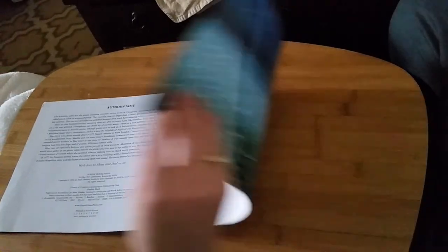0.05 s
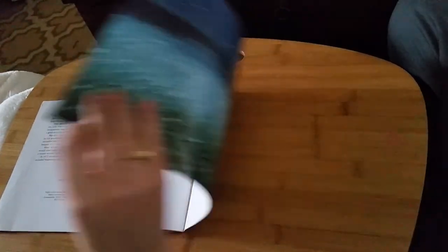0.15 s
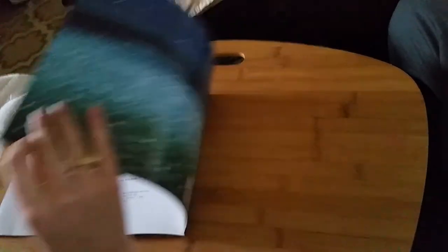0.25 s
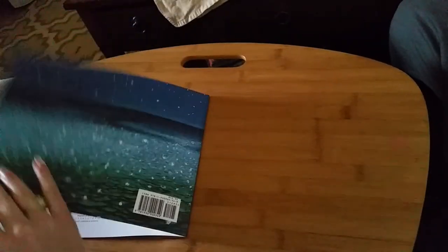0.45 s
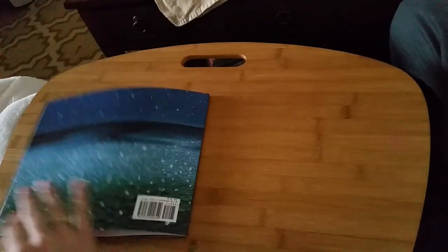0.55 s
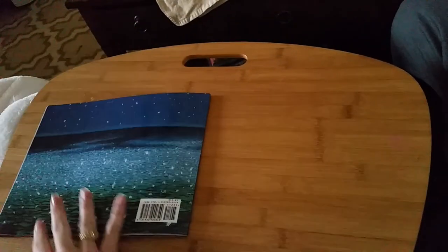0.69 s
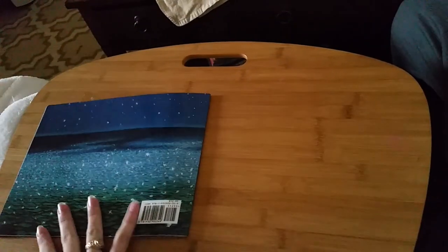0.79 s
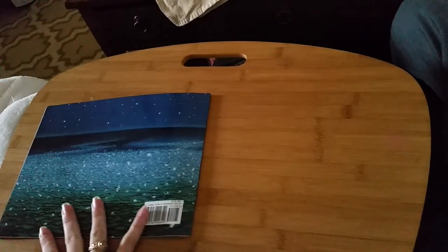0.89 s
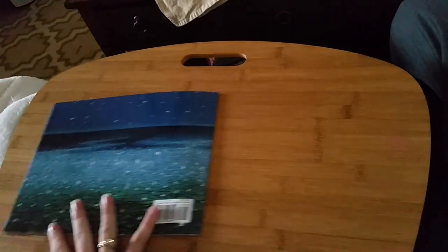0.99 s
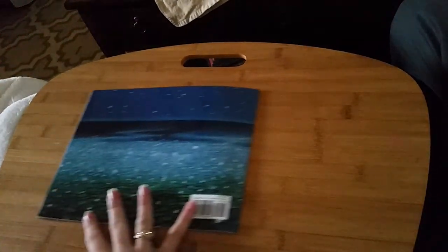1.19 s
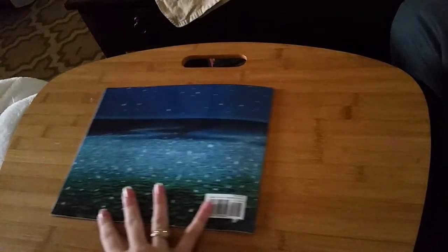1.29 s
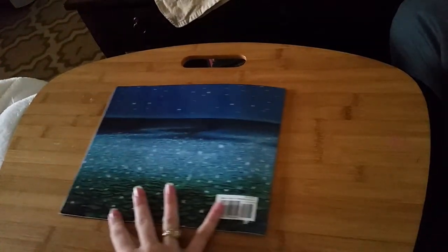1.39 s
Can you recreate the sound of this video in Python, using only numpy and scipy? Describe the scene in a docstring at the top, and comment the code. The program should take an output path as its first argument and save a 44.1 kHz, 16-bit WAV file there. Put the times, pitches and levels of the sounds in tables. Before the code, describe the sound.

Dull thumps and soft rustling as a book is closed and nudged across a lap board.

```python
"""A quiet room, the microphone close to a thin book on a wooden lap board, steady hiss underneath.
The cover swings over and stirs a low rumble, then lands with a dull thump, left of the microphone.
It settles with small knocks and a rustle of pages. Last, the hand slides the book across the board:
a fine friction hiss with a faint whistle that glides up and back down with the book's speed."""
import sys
import numpy as np
from scipy import signal
from scipy.fft import rfft, irfft
from scipy.io import wavfile
from scipy.ndimage import uniform_filter1d

SR = 44100
rng = np.random.default_rng(int(sys.argv[2]) if len(sys.argv) > 2 else 0)


def unload_audio(sound):
    """Save the sound as a 16-bit wav file, at the path given as the first command line argument."""
    columns = np.transpose(np.atleast_2d(sound))
    # keep every value between -1 and 1, then stretch to whole-number steps
    steps = np.round(np.clip(columns, -1, 1) * 32767)
    wavfile.write(sys.argv[1], SR, steps.astype(np.int16))


N = 63945
T = np.arange(N) / SR


def amp(db):
    """Decibels to gain."""
    return 10 ** (np.asarray(db) / 20)


def unit_rms(x):
    """Scales a signal to rms 1."""
    return x / np.sqrt(np.mean(x ** 2) + 1e-20)


def curves(table, at):
    """Every value column of a table, interpolated along its first column."""
    key, *columns = np.transpose(table)
    return np.array([np.interp(at, key, column) for column in columns])


def add(mix, start_s, sound):
    """Mixes a stereo sound in at a given time."""
    part = mix[:, max(round(start_s * SR), 0):][:, :sound.shape[1]]
    part += sound[:, :part.shape[1]]


def lowpass(x, hz, order):
    """Causal Butterworth low-pass."""
    return signal.sosfilt(signal.butter(order, hz, fs=SR, output="sos"), x)


def noise(spectrum):
    """Unrelated left and right noise with a spectrum in dB per Hz."""
    log_hz = np.log(np.fft.rfftfreq(N, 1 / SR) + 1)
    density_db = curves([(np.log(hz), *levels) for hz, *levels in spectrum], log_hz)
    white = rng.standard_normal((2, N))
    return irfft(rfft(white) * amp(density_db), N) * np.sqrt(SR / 2)


def wander(samples):
    """A smooth random curve of rms 1 that changes over the given number of samples."""
    smoothed = uniform_filter1d(rng.standard_normal(N), samples)
    return unit_rms(uniform_filter1d(smoothed, samples))


def room_tone():
    """The quiet room's low rumble and a narrow hiss, flickering slightly in level."""
    # Noise floor: freq_hz, left_db_per_hz, right_db_per_hz
    spectrum = [(29.3, -66.5, -95), (114, -68.5, -80), (216, -81.5, -86.5), (388, -88.5, -92.5),
                (870, -92, -99), (1460, -98, -102), (1795, -109, -107), (2490, -104, -109),
                (2810, -112, -115), (3240, -104, -114), (3652, -88.5, -111), (4100, -82, -109),
                (4770, -86.5, -112), (5833, -95.5, -117), (6480, -122, -125), (9000, -137, -137),
                (12000, -121, -119), (15500, -119, -117)]
    flicker_db = 0.76 * wander(samples=250)
    return noise(spectrum) * amp(flicker_db)


def room_tail(sound):
    """The furnished room's short reverberation, weak this close to the book."""
    level_db, t60_s, onset_s = -27, 0.11, 0.02
    t = np.arange(SR // 2) / SR
    envelope = np.exp(-np.log(1000) * t / t60_s) * np.minimum(t / onset_s, 1)
    tail = rng.standard_normal((2, len(t))) * envelope
    tail /= np.linalg.norm(tail[0])
    return amp(level_db) * signal.fftconvolve(sound, tail, axes=1)[:, :N]


def handling_rumble():
    """Low rumble that swells as cover and hand move near the microphone."""
    # Rumble before swell and balance: freq_hz, level_db_per_hz
    spectrum = [(15, -67), (33, -57.5), (60, -68.5), (120, -73.5), (180, -88.5), (300, -102), (600, -125),
                (2000, -160)]
    # Swell with the movement, before balance: time_s, left_db, right_db
    swell = [(0, 14.5, 24.5), (.09, 4.5, 4.5), (.18, 20, -10), (.27, 7.5, 9), (.35, 22.5, 21.5),
             (.47, 7, 4), (.56, 6, 13), (.76, -2.5, 9), (1.0, 0, -11), (1.15, -3, 10), (1.31, 2.5, 29),
             (1.4, -2.5, 24)]
    balance_db = [[0], [-26.5]]
    return noise(spectrum) * amp(curves(swell, T)) * amp(balance_db)


def brushes():
    """Paper and fingers brush lightly: faint swishes that swell and fade."""
    # Swish before each stroke's gain: freq_hz, left_db_per_hz, right_db_per_hz
    spectrum = [(101.4, -100, -100), (500, -81.5, -94.5), (1280, -98.5, -100.5), (1940, -106, -101),
                (2350, -103, -94), (3000, -118, -113), (7000, -135, -130), (15000, -130, -125)]
    # Light strokes: middle_s, half_length_s, gain_db
    strokes = [(0.31, 0.17, -2), (0.713, 0.017, -5), (1.065, 0.017, -4.5)]
    swell = sum(amp(db) * np.exp(-((T - middle_s) / half_s) ** 2) for middle_s, half_s, db in strokes)
    return noise(spectrum) * swell


def page_rustle():
    """Grainy rustle while the cover presses the air out of the pages."""
    # Settling pages at full level: freq_hz, left_db_per_hz, right_db_per_hz
    spectrum = [(100, -76.5, -81), (350, -76.5, -75.5), (653, -81.5, -90), (1400, -85, -97),
                (2200, -100, -106), (3200, -118, -120), (8000, -140, -140), (12500, -119, -116),
                (15600, -120, -118)]
    start_s, attack_s, length_s, release_s = 0.376, 0.0057, 0.052, 0.014
    age = T - start_s
    envelope = np.clip(age / attack_s, 0, 1) * np.exp(-np.maximum(age - length_s, 0) / release_s)
    rustle = noise(spectrum) * envelope
    grain_db = 2 * wander(samples=120)
    return rustle * unit_rms(amp(grain_db))


def book_slide():
    """The book rubs over the board: friction hiss and a thin ridge whistle both follow its speed."""
    # Speed of the book, as the rate at which surface ridges pass: time_s, pitch_hz
    speed = [(1.07, 100), (1.12, 900), (1.17, 1250), (1.215, 1600), (1.243, 1790), (1.28, 1480),
             (1.325, 1270), (1.37, 1360), (1.41, 1270), (1.45, 1100)]
    # Friction at the reference speed: freq_hz, left_db_per_hz, right_db_per_hz
    spectrum = [(200, -97, -97), (600, -98, -102), (1500, -101, -98.5), (2200, -104, -97),
                (3000, -112, -104), (4500, -100, -100), (5660, -112, -103), (7560, -120, -110),
                (8200, -120, -105), (9600, -122, -107), (12300, -111, -89.5), (12900, -117, -104),
                (15300, -111, -100)]
    reference_hz, jitter, grain_db = 1678, 0.015, 1.6
    whistle_db = [[-69], [-64]]  # left and right, at the reference speed
    ridge_hz = curves(speed, T)[0]
    cycles = np.cumsum(ridge_hz * (1 + jitter * wander(samples=60))) / SR
    whistle = amp(whistle_db) * np.sin(2 * np.pi * cycles)
    friction = noise(spectrum) * amp(grain_db * wander(samples=200))
    return (ridge_hz / reference_hz) ** 1.3 * (friction + whistle)


def paper_slaps():
    """Paper meets paper flat: a dull tick on top of five of the knocks."""
    # Soft slaps: start_s, left_peak_db, right_peak_db, upper_edge_hz
    slaps = [(0.2015, -33.5, -59, 950), (0.3135, -59, -37, 757), (0.3648, -36.5, -55.5, 1775),
             (0.397, -44, -51, 1390), (0.455, -60, -40.5, 623)]
    out = np.zeros((2, N))
    for start_s, left_db, right_db, upper_edge_hz in slaps:
        tick = lowpass(signal.unit_impulse(SR // 20), upper_edge_hz, order=8)
        tick -= lowpass(tick, hz=556, order=1)  # thins the bass
        add(out, start_s, tick / abs(tick).max() * amp([[left_db], [right_db]]))
    return out


def board_knock(contact_ms, sway_db):
    """A cushioned push rings the board and rocks it on the lap; longer contact sounds duller."""
    # Modes of the board, damped by the lap: pitch_hz, relative_db, t60_s
    board_modes = [(126.4, 5, 0.044), (250, -15.5, 0.077), (395, -6.5, 0.017), (493, -15, 0.029)]
    sway_hz, sway_t60_s = 62.8, 0.082
    modes = board_modes + [(sway_hz, sway_db, sway_t60_s)]
    t = np.arange(SR // 6) / SR
    displacement = sum(amp(db) / hz * np.exp(-np.log(1000) * t / t60_s) * np.sin(2 * np.pi * hz * t)
                       for hz, db, t60_s in modes)
    contact_age = t * 1000 / contact_ms
    push = -contact_age * np.exp(-contact_age)
    velocity = signal.fftconvolve(push, np.diff(displacement))[:len(t)]
    muffled = lowpass(velocity, hz=469, order=6)  # the paper cushions every knock
    return muffled / abs(muffled).max()


def cover_knocks():
    """Cover and hand knock on the board, mostly left of the microphone; the landing is loudest."""
    # Knocks: start_s, louder_side_peak_db, contact_ms, sway_db, left_minus_right_db
    hits = [(0.006, -32, 2.1, -16, 1.5), (0.018, -31.5, 1.4, 7, 9), (0.1411, -21, 2.34, -4, 20.5),
            (0.153, -27.5, 1.3, 4, 31), (0.196, -14.5, 1.45, -4, 40.5), (0.2014, -8, 1.15, -7, 33.5),
            (0.2099, -15, 2.7, -4, 32.5), (0.224, -27.5, 1.07, -6, 17), (0.23, -24, 0.7, -6, 29),
            (0.3119, -15, 1.5, -33, 17.5), (0.339, -17, 2.3, -16, 21.5), (0.348, -26, 1.4, -26.5, -4),
            (0.3637, 0, 0.66, -8.5, 28.5), (0.373, -15.5, 2.1, -2.5, 9.5), (0.3934, -17.5, 0.49, -18, 24.5),
            (0.404, -12.5, 0.96, -26, 12.5), (0.4091, -17, 1, -27, 29.5), (0.4187, -16, 1.04, 3, 18.5),
            (0.4384, -12.5, 3, -7.5, 34), (0.453, -14, 1.21, 15.5, 10), (0.4573, -17, 2.3, -27.5, 13),
            (0.4851, -23.5, 4.2, -11, 18), (0.495, -19.5, 2.9, -4.5, 35), (0.526, -34, 0.9, 12.5, 13.5),
            (0.69, -28.5, 8, -10, 39), (0.721, -44, 0.75, 5, 5), (0.863, -39.5, 1.4, -10, 32),
            (0.950, -29.5, 4.7, -7, 24), (1.039, -32, 0.52, -22, 39), (1.051, -23.5, 0.65, -10, 25),
            (1.098, -36.5, 1.85, 13, -4.5), (1.273, -36, 4.2, 5, -28), (1.292, -38, 6.3, 1, 15),
            (1.404, -35, 2.4, -20, -42)]
    out = np.zeros((2, N))
    for start_s, peak_db, contact_ms, sway_db, pan_db in hits:
        left_db = peak_db + min(pan_db, 0)
        right_db = peak_db - max(pan_db, 0)
        add(out, start_s, amp([[left_db], [right_db]]) * board_knock(contact_ms, sway_db))
    return out


def scene():
    """Book and board close up, over the room tone; only knocks and slaps get a room tail."""
    thumps = cover_knocks() + paper_slaps()
    return (thumps + room_tail(thumps) + handling_rumble() + page_rustle() + brushes()
            + book_slide() + room_tone())


def record(dry):
    """The recorder behind the microphone cuts off the highest treble."""
    edge_hz = 15760
    band_limit = signal.firwin(511, edge_hz, window=("kaiser", 9), fs=SR)
    return signal.oaconvolve(dry, band_limit[None], "same")


dry = scene()
out = record(dry)
unload_audio(out)
```